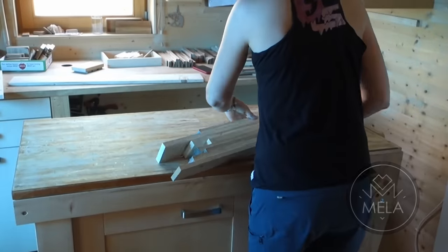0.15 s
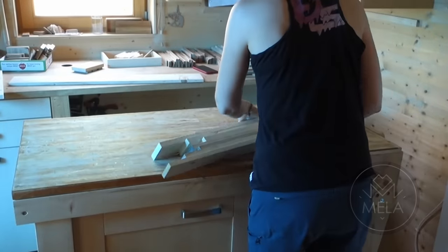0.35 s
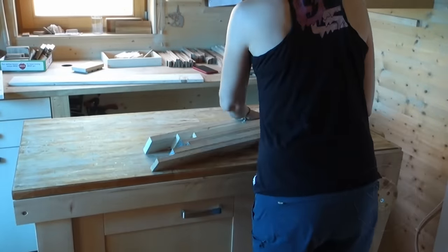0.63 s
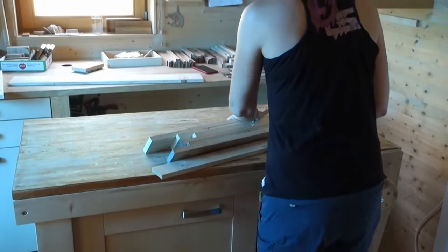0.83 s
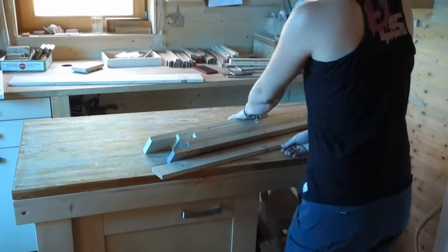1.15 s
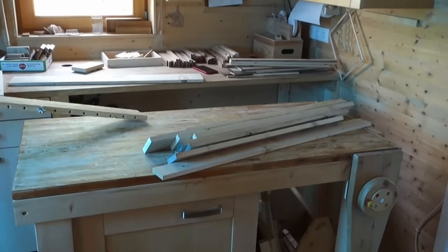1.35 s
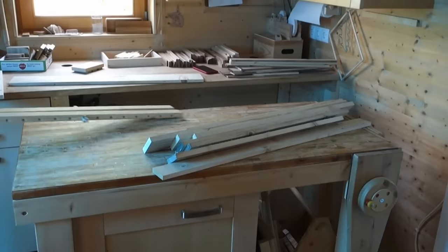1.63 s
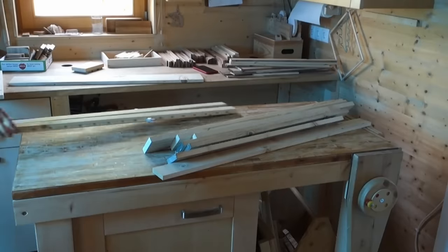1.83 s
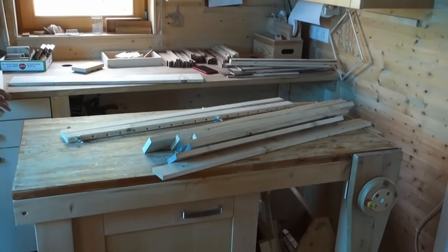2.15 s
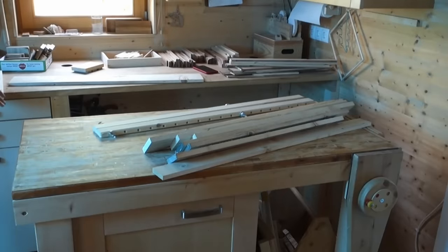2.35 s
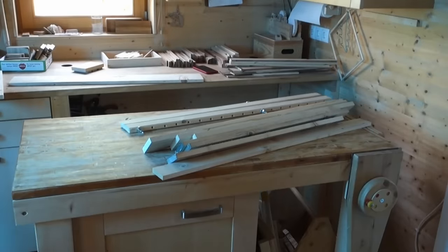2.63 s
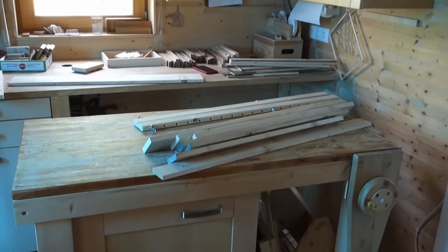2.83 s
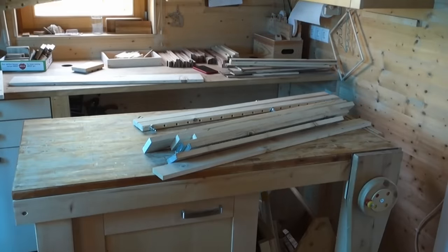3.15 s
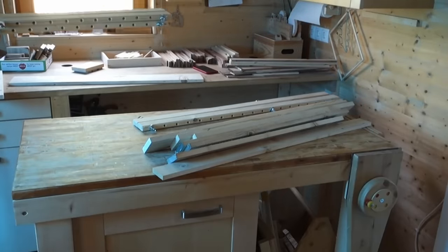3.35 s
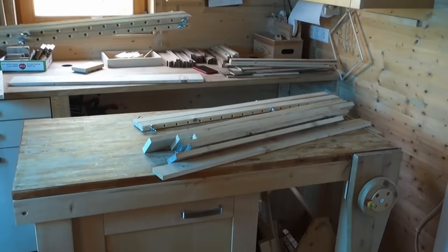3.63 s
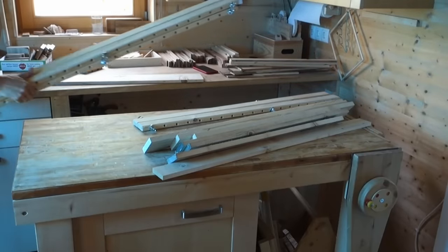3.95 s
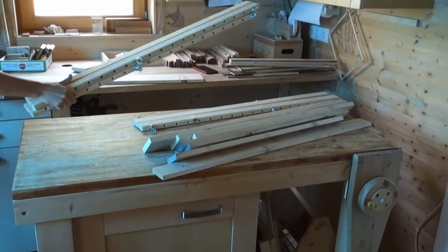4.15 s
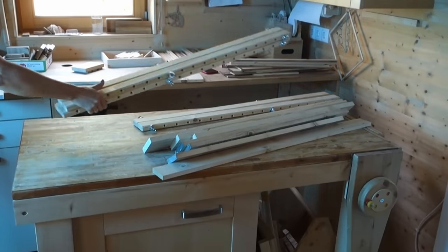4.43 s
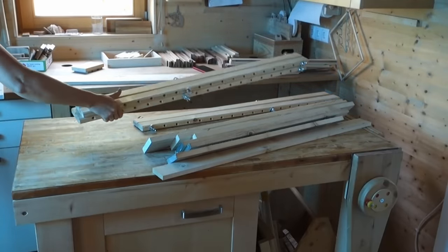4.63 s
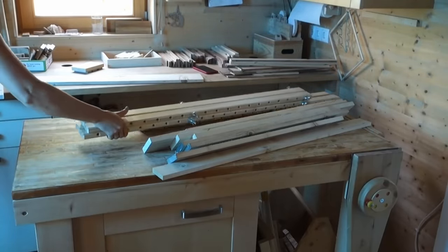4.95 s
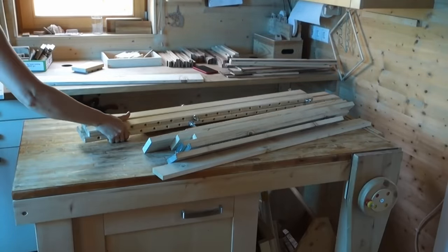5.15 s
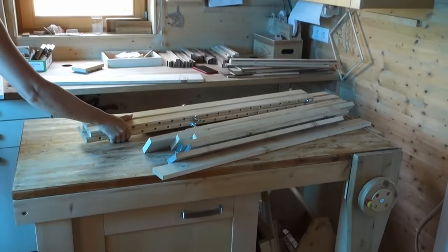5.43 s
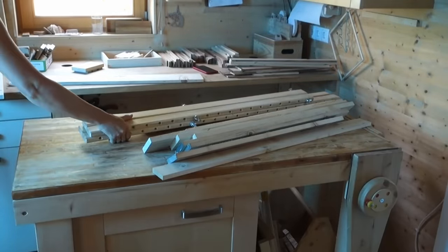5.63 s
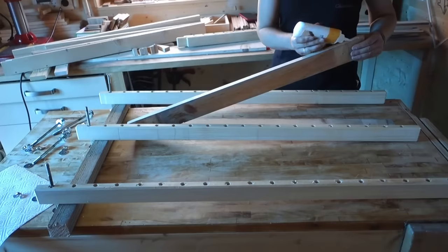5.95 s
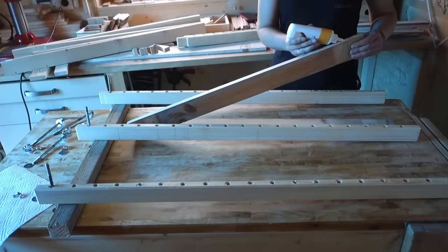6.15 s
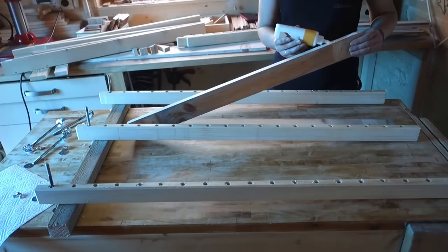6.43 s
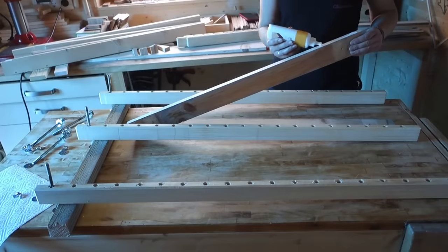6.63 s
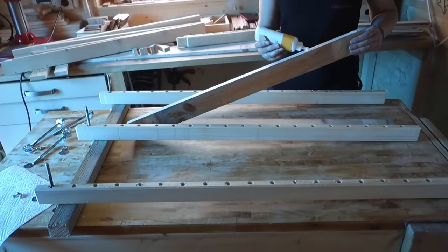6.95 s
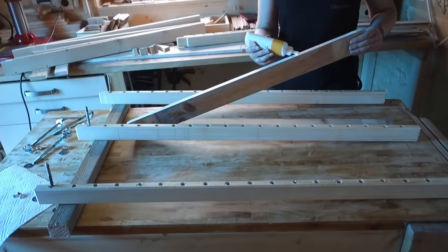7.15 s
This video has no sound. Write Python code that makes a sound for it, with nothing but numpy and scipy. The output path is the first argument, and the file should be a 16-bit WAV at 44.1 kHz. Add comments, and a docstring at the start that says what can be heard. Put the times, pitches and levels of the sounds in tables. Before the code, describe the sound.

In a small workshop, wooden slats are knocked and shoved together on a bench. A long rail with loose metal fittings lands, bounces and slides along the pile with a brief groan and dry squeaks. After light ticks and pings, a second rail touches down, then clatters firmly with jingles. It ends in faint room noise and wavering low hum. Fairly close stereo microphone, short room decay.

```python
"""Clacks, bounces and rasps of wood: slats are shoved together on a workbench in a small workshop, then two
long rails with loose metal fittings are fetched, dropped and slid onto the pile.
Blows and random stick-slip jolts excite damped modes of the wood, the fittings jingle in metal modes, and
filtered noise gives the surface rasp and the short room decay.
Near the end the room noise steps up and a low hum wavers in it."""
import sys
import numpy as np
from scipy import signal
from scipy.fft import rfft, irfft
from scipy.io import wavfile
from scipy.ndimage import uniform_filter1d, minimum_filter1d

SR = 44100
rng = np.random.default_rng(int(sys.argv[2]) if len(sys.argv) > 2 else 0)


def unload_wav(signal):
    """Save mono or channel-first audio to the path in sys.argv[1] as 16-bit WAV at rate SR, clipped to [-1, 1]."""
    wavfile.write(
        sys.argv[1],
        SR,
        np.round(np.clip(np.atleast_2d(signal).T, -1, 1) * 32767).astype(np.int16),
    )


N = 321489
TIME = np.arange(N) / SR
RING = np.arange(int(.55 * SR)) / SR  # time axis of one ringing answer

# nominal modes of each piece of wood: [frequency_hz, level_db]
SLATS = [(113, -7.5), (267, -8), (347, -9), (405, -0.5), (454, 2.5), (637, 8.5), (731, 5), (795, 8.5),
         (868, 4), (996, -1.5), (1092, 5), (1213, 7), (1262, -28.5), (1321, 2), (1457, -12), (1563, -17),
         (1759, -22), (1843, -16), (1986, -26), (2048, -57), (2109, -5), (2227, -15), (2358, -5),
         (2456, -19)]
FIRST_RAIL = [(113, -16), (177, 4), (211, -0.5), (355, 3), (413, 0), (634, 10), (750, 9.5), (868, 5),
              (960, 4), (996, -2.5), (1094, 7), (1194, 4), (1353, 7), (1420, 0), (1491, -4.5), (1542, 3),
              (1607, -6.5), (1811, 3.5), (1863, 5), (2052, -10), (2115, -17), (2151, -3.5), (2245, 5),
              (2290, -27), (2377, 1.5), (2626, -17), (2761, 0.5)]
RAIL_EDGE = [(1086, 4.5), (1352, 3), (1430, 3), (1631, 13), (1829, 3), (1950, 6.5), (2145, 4), (2751, -19),
             (2846, -14), (3302, -21)]
RAIL_END = [(166, -17), (304, 1), (353, -1.5), (410, -3), (482, 0), (598, 4), (656, 7.5), (714, 8),
            (818, -9), (1199, -31), (1578, 0), (1729, -25), (1797, -9), (2150, -6)]
SECOND_RAIL = [(113, -3.5), (174, 4.5), (336, 0), (374, -13), (410, 8.5), (530, -25), (574, 7), (650, -18),
               (727, -19.5), (828, -7), (868, 15), (966, 12), (1068, 3), (1146, 6), (1334, 12.5), (1497, 9),
               (1542, 10), (1651, 5), (1775, 9.5), (1858, 3), (1966, 7), (2026, -45), (2176, 0),
               (2484, -35)]
# which piece is being handled: [start_s, modes]
PIECES = [(0, SLATS), (1.2, FIRST_RAIL), (2.88, RAIL_EDGE), (3.45, RAIL_END), (4.9, SECOND_RAIL)]
# nominal modes of the metal fittings: [frequency_hz, level_db]
FIRST_FITTINGS = [(3252, -39), (4059, -59), (5884, -42.5), (6848, -52), (7321, -46.5), (9480, -44),
                  (11768, -48), (12968, -45), (13937, -38), (14180, -54.5), (14298, -41), (14998, -53),
                  (15052, -65), (15332, -32)]
CATCH = [(3950, 1), (7420, -3.1)]
SECOND_FITTINGS = [(3768, -46.5), (4753, -64), (6089, -54), (7122, -44), (8473, -60), (11030, -52),
                   (11149, -63), (11752, -46), (14863, -49), (15149, -46), (15735, -60)]
# spectrum of the crowded weak modes of pile and bench: [frequency_hz, relative_level_db]
WOOD = [(29, -56.5), (50, -38), (75, -43.5), (103, -17.5), (177, -6), (446, 0.5), (523, 0.5), (767, 7),
        (1650, -4), (1850, -2.5), (5110, -24), (5850, -22.5), (8200, -38), (11000, -38), (14300, -63),
        (22000, -120)]
# reference decay of a knock in the room: [frequency_hz, t60_s]
DECAY = [(100, 0.41), (300, 0.29), (800, 0.29), (2000, 0.3), (5000, 0.27), (12000, 0.22)]
# likeness of left and right: [frequency_hz, correlation]
LIKENESS = [(40, 0.96), (110, .999), (220, 0.997), (350, .98), (700, 0.94), (1400, 0.85), (2800, 0.7),
            (5000, 0.08), (15000, .02)]
# a piece is pushed along; relative levels:
# [start_s, length_s, level_db, slope_db_per_s, hardness_db (clack against body), bench_db (thump against body),
#  fibre_hiss_db]
STROKES = [(0.0, 0.027, -36, -20, 33, 0, -18), (0.189, 0.14, -47.5, 48, 15, 19.5, -3),
           (0.38, 0.18, -28.5, 22.5, 2.5, 0.5, -13.5), (0.676, 0.2, -46.5, 27, 8, 8, -20),
           (1.517, 0.25, -24.5, 38.5, 11, -2.5, -15), (1.802, 0.23, -20, -25, 5.5, -9, -13),
           (2.187, 0.64, -23, -18, -2.5, 4, -34), (2.863, 0.11, -41.5, -15, 15, -9, -12),
           (3.015, 0.2, -37, 19, 14, 0, -6.5), (3.255, .18, -36, -32, 7, -18, -27)]


def knocks(thump_db=-7, body_db=-2, clack_db=-2, crack_db=-3, direct=0.51, direct_s=0.02, snap=0.79, snap_s=0.014):
    """Impact excitation: each blow starts with a stronger direct part, then rings on in wood and room."""
    # sharpness of the edge that strikes: [start_s, crack_against_clack_db]
    sharpness = [(0, -22), (1.2, -11), (1.95, -4.5), (2.88, 3), (3.45, -9.5), (4.55, 0), (4.9, -9)]
    out = np.zeros((2, N))
    direct_shape = 1 + direct * np.exp(-RING / direct_s)
    snap_shape = (1 + snap * np.exp(-RING / snap_s)) * (1 - np.exp(-RING / 0.00023))
    trims_db = [thump_db, body_db, clack_db, crack_db]
    for s, db, hard, bench in blows():
        ringing = wood(in_hand(PIECES, s), crowd_db=0.0, t60_scale=0.95, contact_s=0.00031)
        parts = registers(ringing * direct_shape, crowd() * snap_shape)
        gains = undb(register_levels(db, hard, bench, in_hand(sharpness, s)) + trims_db)
        add(out, s, sum(gain * attack_unit(part) for gain, part in zip(gains, parts)))
    return out


def blows():
    """Impact sequence: taps thump more as they soften, bounces soften as they weaken; relative levels."""
    # a piece lands and bounces:
    # [start_s, level_db, hardness_db, bench_db, first_gap_s, change_per_bounce_db]
    landings = [(0.001, -13.5, -8, 1, 0.025, -10), (0.307, -9, -1.5, -1, 0.023, -8.5),
                (0.87, -7, -2, -6, 0.023, -5.5), (1.369, -7, 3.5, 1, 0.027, -3.5),
                (1.495, -14.5, -4, 3, 0.031, -5), (1.761, -14, 5, -10, .03, -4.5),
                (1.996, -11, 4.5, 4, .044, -0.97), (3.906, -21.5, 3, 14, 0.034, -6),
                (5.026, -15.5, 0.5, 2, 0.027, 0), (5.154, -20.5, 2.5, 1.5, 0.038, -6)]
    # single contacts while a piece is handled: [start_s, level_db, hardness_db]
    touches = [(0.271, -14.5, -14), (0.756, -46, -25.5), (1.529, -23, -13), (1.7, -18.5, -3.5),
               (1.737, -23, 15), (1.998, -15.5, 22), (2.014, -18, -15), (2.241, -28, 11.5),
               (2.283, -29.5, 0), (2.341, -30, -2), (2.377, -27.5, -10), (2.765, -38.5, -15),
               (3.006, -41, 6), (3.042, -36.5, -2), (3.067, -30, 11), (3.152, -33, 8.5), (3.182, -32, 4),
               (3.212, -37.5, 16), (3.508, -41.5, -16), (3.526, -37.5, -13.5), (3.819, -48, 17),
               (3.914, -18, -10.5), (4.19, -61, 4), (4.463, -50.5, 10), (4.656, -39, -2.5)]
    tap_bench_db, soft_thump = -4.5, 0.69  # soft_thump: dB of thump per dB of lost hardness
    softening = 0.25  # dB of hardness lost per dB of strength lost
    contacts = [(s, db, hard, tap_bench_db - soft_thump * hard) for s, db, hard in touches]
    for s, db, hard, bench, gap_s, change_db in landings:
        for at, lost in bounces(s, gap_s, change_db):
            contacts.append((at, db + lost, hard + softening * lost, bench))
    return contacts


def bounces(s, gap_s, change_db, count=5):
    """Energy loss at impact shortens each gap and changes each level: (s, dB against the first)."""
    k = np.arange(count)
    gaps = gap_s * 0.94 ** k
    return zip(s + np.cumsum(gaps) - gaps, change_db * k)


def register_levels(db, hardness_db, bench_db, edge_db):
    """Contact stiffness: levels of thump, body, clack and crack, shifted from body to clack by hardness."""
    body, clack = db - hardness_db / 2, db + hardness_db / 2
    return np.array([body + bench_db, body, clack, clack + edge_db])


def registers(ringing, surface):
    """Spectral division of a wooden sound: thump, body and clack from the modes, crack from the surface."""
    thump = band(ringing, 95, 374)
    body = band(ringing, 470, 1115, order=4)
    clack = band(ringing, 1310, 3270, order=3)
    crack = band(surface, 2530, 15400, order=4)
    return thump, body, clack, crack


def wood(modes, crowd_db, t60_scale, contact_s):
    """Impulse response of wood and room to a tap, whose onset is smoothed over the contact time."""
    t60 = t60_scale * lookup(DECAY, np.transpose(modes)[0])
    answer = ring(modes, t60, scatter_db=5.0, detune=0.0072) + undb(crowd_db) * crowd()
    return answer * (1 - np.exp(-(RING / contact_s) ** 2))


def ring(modes, t60, scatter_db, detune):
    """Modal superposition: each contact reweights damped modes, whose ear phases part most in the treble."""
    hz, db = np.transpose(modes)
    size, shift, phase, skew = rng.standard_normal((len(hz), 4)).T
    apart = np.arccos(np.clip(lookup(LIKENESS, hz), 0, 1)) * skew / 2
    ear_phase = np.pi * phase + np.outer([1, -1], apart)
    weight = undb(db + scatter_db * size) * np.exp(1j * ear_phase)
    pole = 2j * np.pi * hz * (1 + detune * shift) - np.log(1000) / t60
    # exp(pole * t) is the product of a coarse and a fine time step
    coarse = np.exp(np.outer(pole, RING[::128]))
    fine = np.exp(np.outer(pole, RING[:128]))
    tone = ((weight[:, None] * coarse.T) @ fine).imag.reshape(2, -1)
    return attack_unit(tone[:, :len(RING)])


def crowd():
    """High modal density: the many weak modes of pile and room are noise, each octave with its own decay."""
    spectrum = rfft(noise(len(RING), WOOD))
    hz = np.fft.rfftfreq(len(RING), 1 / SR)
    octave = np.round(np.log2(np.clip(hz, 100, 12800) / 100))
    total = 0
    for k in range(8):
        decay = undb(-60 * RING / lookup(DECAY, 100 * 2 ** k))
        total = total + irfft(spectrum * (octave == k), len(RING)) * decay
    return attack_unit(total)


def slides(rumble_db=-3, body_db=1.0, scrape_db=-4.0, rasp_db=-3, edge_db=-7):
    """Stick-slip friction: a dense train of slips rings the modes of the piece in hand, under a surface rasp."""
    rubbed = np.zeros((2, N))
    ends = [start for start, _ in PIECES[1:]]
    for (start, modes), end in zip(PIECES[:3], ends):
        for contact in range(2):  # both ends of the piece rub, and the contact damps it
            jolts = slips(per_second=220, spread_db=3.0) * (TIME >= start) * (TIME < end)
            answer = wood(modes, crowd_db=0, t60_scale=.35, contact_s=0.0034)
            rubbed += signal.oaconvolve(jolts[None], unit(answer), axes=1)[:, :N]
    # the rasp comes from the fibres at the surface
    rasp = (noise(N, WOOD) + rail_rasp()) * undb(0.68 * drift(size=160))
    pressures = 0
    for s, length_s, db, slope, hard, bench, _ in STROKES:
        gains = undb(register_levels(db, hard, bench, edge_db))
        pressures = pressures + np.outer(gains, push(s, length_s, slope))
    out = 0
    trims_db = [rumble_db, body_db, scrape_db, rasp_db]
    for part, pressure, db in zip(registers(rubbed, rasp), pressures, trims_db):
        power = np.abs(uniform_filter1d(np.mean(part ** 2, axis=0), size=4500))
        even = part / np.sqrt(power + 1e-6)  # the stroke alone shapes the level
        out = out + even * pressure * undb(db)
    return out


def slips(per_second, spread_db):
    """Stick-slip release: tiny jolts at random moments, a few much larger than the rest."""
    sizes = undb(spread_db * np.minimum(rng.exponential(size=N), 4)) * rng.choice([-1, 1], N)
    return sizes * (rng.random(N) < per_second / SR)


def push(s, length_s, db_per_s):
    """Friction follows contact pressure: it builds quickly, grows or eases while it lasts, then lets go."""
    attack_s, release_s = 0.038, 0.044
    held = np.clip(TIME - s, 0, length_s)
    after = np.clip(TIME - s - length_s, 0, 1)
    return np.minimum(held / attack_s, 1) * undb(db_per_s * held) * np.exp(-after / release_s)


def rail_rasp(width=.012):
    """Resonant filtering: surface noise sings in narrow high resonances while the first rail is handled."""
    # resonances of the rail: [frequency_hz, level_db]
    resonances = [(2950, -19.5), (3950, -25), (5900, -28.5), (7350, -32.5)]
    hiss = noise(N, [(2000, 0), (9000, 0)])
    sung = sum(undb(db) * unit(band(hiss, hz * (1 - width), hz * (1 + width), order=1)) for hz, db in resonances)
    return sung * (TIME >= PIECES[1][0]) * (TIME < PIECES[2][0])


def groan(db=-3, jitter=0.0269, flutter_db=2, fall_db=-7):
    """Periodic stick-slip: slips lock into a rough harmonic tone that sinks, then rises a little."""
    # slip rate before jitter, relative level: [time_s, rate_hz, level_db]
    slip_path = [(1.769, 735, -5.5), (1.821, 691, -26), (1.87, 623, -39), (1.91, 599.5, -39),
                 (1.95, 634, -15), (1.975, 639, -21)]
    s, hz, level_db = np.transpose(slip_path)
    rate = np.interp(TIME, s, hz) * (1 + jitter * drift(size=90))
    phase = 2 * np.pi * np.cumsum(rate) / SR
    tone = sum(undb(fall_db * k) * np.sin((k + 1) * phase) for k in range(4))
    return unit(tone * undb(flutter_db * drift(size=250))) * gain_curve(s, level_db) * undb(db)


def squeaks(db=-10, swell_s=0.013):
    """Friction-excited resonance: short rough chirps of noise, each in a pair of close resonances."""
    # dry rubbing surfaces catch; split is the distance of each resonance from the pitch as a share of it:
    # [start_s, relative_level_db, pitch_hz, split]
    catches = [(2.435, -23, 2950, .06), (2.492, -21, 3070, .07), (2.5277, -26, 2850, .05),
               (2.566, -25.5, 3040, 0.075), (2.751, -28.5, 3080, 0.073), (5.7523, -52, 2490, .01),
               (5.895, -46, 2420, .01)]
    out = np.zeros((2, N))
    for s, level_db, hz, split in catches:
        rub = noise(len(RING), [(2000, -6), (4000, -12)])
        centres = hz * (1 - split), hz * (1 + split)
        chirp = sum(band(rub, 0.98 * centre, 1.02 * centre, order=2) for centre in centres)
        swell = RING * np.exp(-RING / swell_s)
        add(out, s, undb(level_db + db) * attack_unit(chirp * swell))
    return out


def rustle(db=0.5, grain=0.19):
    """Random micro-contacts: wood fibres brush past each other in each stroke as a grainy hiss."""
    hiss = noise(N, [(1500, 0.0), (4000, 5.5), (7000, 2.5), (10000, -3), (15000, -2.5)])
    grains = 1 + grain * unit(uniform_filter1d(rng.standard_normal(N), size=120))
    pressure = sum(undb(level_db + hiss_db) * push(s, length_s, slope)
                   for s, length_s, level_db, slope, _, _, hiss_db in STROKES)
    return undb(db) * unit(hiss * grains) * pressure


def jingles(db=-10.5, t60=0.22, tick_db=-11.5, tick_t60=0.17, chatter_s=0.026):
    """Repeated impact of loose fittings: four slightly detuned parts ring at scattered moments after a tick."""
    # the fittings are shaken and bounce: [start_s, relative_level_db, first_gap_s, change_per_bounce_db]
    shaken = [(1.375, -16.5, .03, -3.5), (1.6007, -29, .03, -20), (1.9975, -17.5, 0.068, -6),
              (2.091, -21, 0.039, -3), (2.2827, -31.5, 0.057, -4), (2.364, -32.5, 0.059, -1.5),
              (2.869, -35, .026, -4.5), (3.282, -37, .04, -11), (3.3282, -37, .03, -8),
              (5.0336, -18, .038, -5.5), (5.1555, -20, .03, -8.5)]
    # which fitting is shaken: [start_s, modes]
    fittings = [(0, FIRST_FITTINGS), (3.25, CATCH), (4.9, SECOND_FITTINGS)]
    out = np.zeros((2, N))
    shakes = [(at, first_db + lost) for s, first_db, gap_s, change_db in shaken
              for at, lost in bounces(s, gap_s, change_db)]
    for s, level_db in shakes:
        modes = in_hand(fittings, s)
        hiss = noise(len(RING), [(2000, -32), (5000, -2.0), (9000, -5.5), (12000, -9.5), (15500, -8.5)])
        tick = attack_unit(hiss * undb(-60 * RING / tick_t60))
        add(out, s, undb(level_db + tick_db) * tick * (1 - np.exp(-RING / 0.0013)))
        for part, (lag, size) in enumerate(rng.random((4, 2))):
            tone = ring(modes, t60, scatter_db=4, detune=.007 + .005 * part)
            delay_s = chatter_s * lag * min(part, 1)  # the first part is on time
            add(out, s + delay_s, undb(level_db + db - 1.3 * size) * tone)
    return out


def pings(db=-1):
    """Free vibration: a small metal bracket rings clearly as the second rail is picked up."""
    # [start_s, relative_level_db]
    strikes = [(3.139, -29), (3.209, -30)]
    # nominal modes: [frequency_hz, level_db]
    bracket = [(2145, -15), (2846, -0.5), (3950, -9), (4770, -15)]
    out = np.zeros((2, N))
    for s, level_db in strikes:
        add(out, s, undb(level_db + db) * ring(bracket, t60=.34, scatter_db=1, detune=0.00085))
    return out


def room_noise(flutter_db=-1.1, whirr_db=-59):
    """Broadband noise: soft air steps up near the end, duller, with a faint whirr and first in the right ear."""
    # noise spectra before and after the step: [frequency_hz, relative_level_db]
    early_air = [(15, -44), (25, -8), (64, 3), (97, -4), (153, 4), (301, 2), (416, -0.5), (695, 1),
                 (775, -5), (1100, -5), (1610, -2), (5000, -15), (16000, -16)]
    late_air = [(15, -43), (25, -18), (64, -7), (97, -7.5), (170, -2.5), (212, -6.5), (293, -3), (451, -16),
                (714, -7.5), (1190, -20), (1790, -17.5), (2050, -24.5), (2840, -26), (4610, -28),
                (16000, -30)]
    # level before the step, under the flutter: [time_s, level_db]
    early_level = [(0, -26.5), (.18, -51), (.7, -54), (1.0, -46), (1.12, -53), (1.3, -44.5), (2.8, -58),
                   (2.95, -43), (3.5, -43), (3.85, -43.5), (4.03, -38), (4.4, -46), (5.0, -48),
                   (5.4, -53.5), (5.7, -55.5)]
    step_s, late_db = 5.746, -45.5
    early = noise(N, early_air) * undb(np.interp(TIME, *np.transpose(early_level)))
    whirr = unit(band(noise(N, WOOD), 1655.4, 1751.52, order=2))
    late = noise(N, late_air) * undb(late_db) + undb(whirr_db) * whirr
    late = np.array([np.roll(late[0], 4), late[1]])  # left lags by four samples
    return np.where(TIME < step_s, early, late) * undb(flutter_db * drift(size=2500))


def hum(hz=178, waver=0.0431, db=-2):
    """Frequency modulation: a faint low sine wavers around its mean pitch and comes and goes."""
    # [start_s, length_s, relative_level_db]
    swell_table = [(5.73, 0.25, -41), (5.942, 0.21, -45), (6.187, 0.22, -39), (6.443, 0.1, -45),
                   (6.66, 0.38, -54)]
    phase = 2 * np.pi * np.cumsum(hz * (1 + waver * drift(size=900))) / SR
    swells = sum(undb(level_db) * np.sin(np.pi * np.clip((TIME - s) / length_s, 0, 1))
                 for s, length_s, level_db in swell_table)
    return unit(np.sin(phase)) * swells * undb(db)


def lean(x):
    """Interaural level difference: tilt the balance of left and right with frequency."""
    # the treble leans to the right: [frequency_hz, left_minus_right_db]
    balance = [(300, 0), (1000, .5), (2400, -.3), (4400, -3.8), (8000, -3.4), (15000, -2.5)]
    db = lookup(balance, np.fft.rfftfreq(N, 1 / SR))
    return irfft(rfft(x) * undb(np.outer([1, -1], db / 2)), N)


def noise(size, colour):
    """Interaural coherence: coloured stereo noise, alike in the bass and nearly unrelated in the high treble."""
    hz = np.fft.rfftfreq(size, 1 / SR)
    mid, side = rfft(rng.standard_normal((2, size)))
    alike = np.clip(lookup(LIKENESS, hz), 0, .999)
    pair = mid * np.sqrt(1 + alike) + np.outer([1, -1], side * np.sqrt(1 - alike))
    return unit(irfft(pair * undb(lookup(colour, hz)), size))


def drift(size):
    """Low-passed randomness: a wander smoothed twice over size samples, rms 1."""
    return unit(uniform_filter1d(uniform_filter1d(rng.standard_normal(N), size), size))


def gain_curve(s, db, release_s=0.046):
    """Exponential decay: a level curve, silent before its span and dying away after it."""
    fade = np.exp(-np.clip((TIME - s[-1]) / release_s, 0, 50))
    return uniform_filter1d(undb(np.interp(TIME, s, db)) * (TIME >= s[0]) * fade, size=400)


def band(x, lo_hz, hi_hz, order=3):
    """Frequency selection: causal Butterworth band-pass."""
    sos = signal.butter(order, [lo_hz, min(hi_hz, .47 * SR)], "band", fs=SR, output="sos")
    return signal.sosfilt(sos, x)


def undb(db):
    """Logarithmic level: decibels to amplitude gain."""
    return 10 ** (np.asarray(db) / 20)


def unit(x):
    """Mean power: scale to rms 1."""
    return x / np.sqrt(np.mean(x ** 2) + 1e-20)


def attack_unit(x, size=1300):
    """Onset power: scale so that the first size samples, about 30 ms, have rms 1."""
    return x / np.sqrt(np.mean(x[:, :size] ** 2))


def lookup(table, hz):
    """Logarithmic pitch scale: interpolate (Hz, value) points on a log-frequency axis."""
    f, v = np.transpose(table)
    return np.interp(np.log(np.maximum(hz, 1)), np.log(f), v)


def in_hand(table, s):
    """Source selection: the latest entry that has started by time s."""
    return [entry for start, entry in table if start <= max(s, 0)][-1]


def add(out, s, sound):
    """Linear superposition: mix a sound in at time s."""
    i = max(int(s * SR), 0)
    out[:, i:i + sound.shape[1]] += sound[:, :N - i]


def scene():
    """Superposition of all the handling noise with the room's own."""
    handling = knocks() + slides() + groan() + squeaks() + rustle() + jingles() + pings()
    return lean(handling + room_noise() + hum())


def record(dry, ceiling_db=-10.0):
    """Dynamic range compression: a quick limiter holds down the loudest blows and their peaks; the top is cut."""
    loudness = np.sqrt(np.abs(uniform_filter1d(np.mean(dry ** 2, axis=0), size=500)))
    limited = dry / (1 + (loudness / undb(ceiling_db)) ** 4) ** (1 / 4)
    headroom = np.minimum(1, .85 / (np.abs(limited).max(axis=0) + 1e-9))
    limited = limited * uniform_filter1d(minimum_filter1d(headroom, size=120), size=120)
    top_cut = signal.ellip(10, .2, 70, 16100, fs=SR, output="sos")
    return signal.sosfilt(top_cut, limited)


dry = scene()
out = record(dry)
unload_wav(out)
```